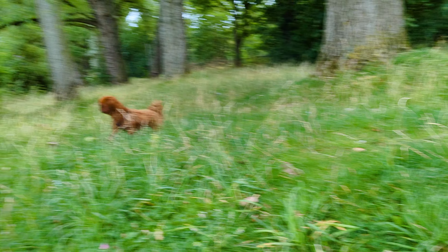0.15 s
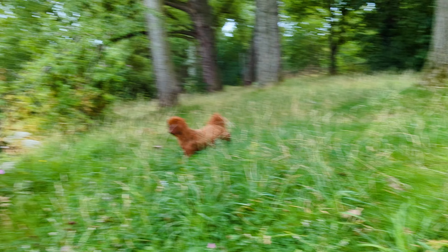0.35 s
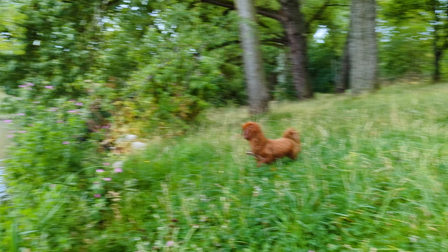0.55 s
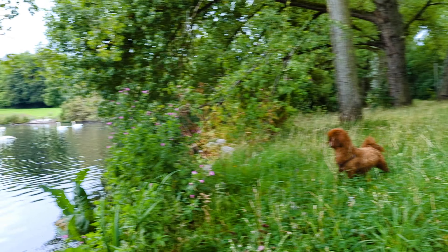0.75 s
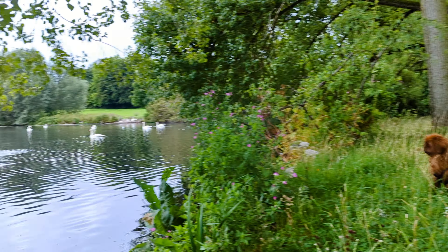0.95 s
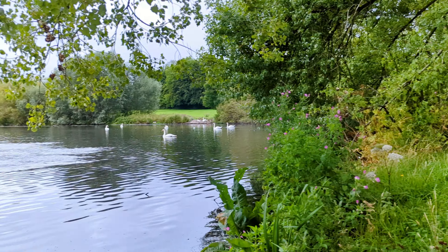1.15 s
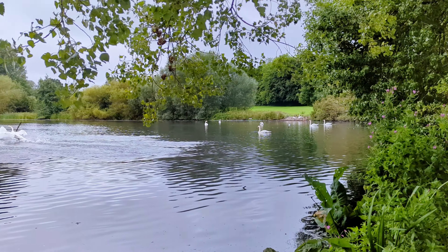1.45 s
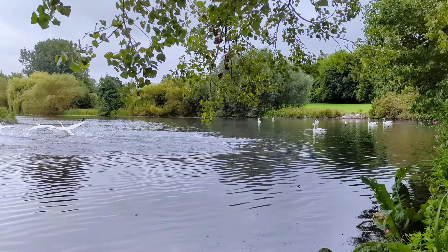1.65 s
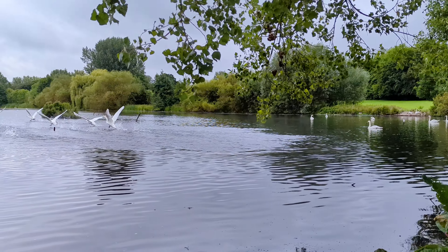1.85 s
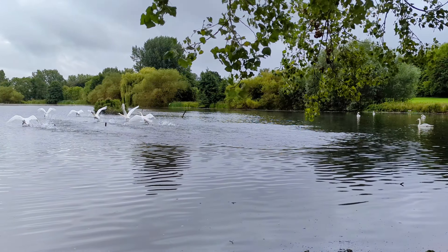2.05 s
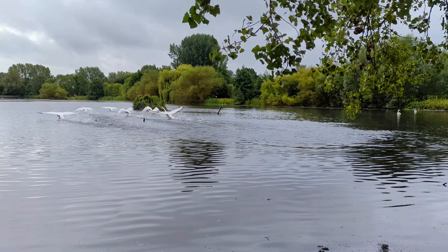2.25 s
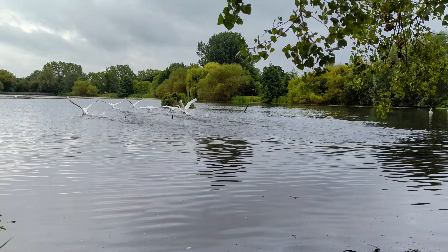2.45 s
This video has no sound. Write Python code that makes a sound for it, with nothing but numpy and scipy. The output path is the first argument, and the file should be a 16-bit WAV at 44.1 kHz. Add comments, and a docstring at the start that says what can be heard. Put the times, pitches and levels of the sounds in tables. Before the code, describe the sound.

Swans taking off slap lake water almost from the start, softly at first, then louder and denser from about 1 second, with a strong crack near 1.5, continuing to the end at 2.6. Hollow wing puffs are strongest around 1.3. Deep wind thumps hit mostly left from 0.35 to 0.9, then ease. The flock drifts right over churning, bubbling water, distant low roar and leaf hiss.

```python
"""A low rumble and the soft sound of a lake come first; almost at once swans taking off slap the water.
Each slap is a burst of clicks and noise with two ringing air pockets and a puff of spray; wingbeats are hollow
puffs of noise. The flock moves from near the middle to the right. Wind and handling are deep noise with
pressure thumps, and the wind buffets are mostly on the left. Behind lie churned water (noise and tiny ringing
bubbles), a distant roar of slowly changing noise bands, and a hiss of leaves (separate noise in each ear)."""
import sys
import numpy as np
from scipy import signal
from scipy.fft import rfft, irfft, next_fast_len
from scipy.io import wavfile
from scipy.ndimage import uniform_filter1d

SR = 44100
rng = np.random.default_rng(int(sys.argv[2]) if len(sys.argv) > 2 else 0)


def master_out(mix):
    """Clip the mix to full scale and print it as 16-bit PCM to the path in sys.argv[1]."""
    frames = np.transpose(np.atleast_2d(mix))
    ceiling = np.clip(frames, -1, 1)
    pcm = np.round(ceiling * 32767).astype(np.int16)
    wavfile.write(sys.argv[1], SR, pcm)


N = 114660  # length of the scene in samples

# Levels are set before the microphone response; colours give only the balance between pitches.
# Slaps on the water: (time [s], level before SLAP_GAIN_DB [dB], plop before PLOP_GAIN_DB [dB], plop pitch [Hz],
#   spray before SPRAY_GAIN_DB [dB], ring pitch [Hz], ring [dB]); plop, spray and ring are relative to the crack
SLAPS = [(0.0779, -28, -7, 700, -21, 3020, -9), (0.111, -22, -4.5, 910, -19, 2090, -10),
         (0.36, -28.5, 0, 794, -19, 3280, -7), (0.399, -22.5, -21, 876, -18.5, 2020, 1),
         (0.4523, -25, -5, 870, -18, 2110, -4), (0.5346, -24.5, -16, 1020, -16, 3470, -4),
         (0.5784, -36, 10, 800, -25, 1990, -9), (0.6418, -25, -4.5, 830, -35, 1900, -5),
         (0.674, -20.5, -7, 710, -18.5, 1970, -2.5), (0.7406, -32, 2.5, 537, -33, 2550, 3),
         (0.7651, -26.5, -5, 816, -22, 1300, 2.5), (0.8229, -21.5, -3.5, 615, -22, 1770, -0.5),
         (0.9242, -20, -3.5, 760, -10.5, 4570, -12), (1.0275, -26, -2.5, 650, -16.5, 2630, -7),
         (1.0872, -15.5, -12.5, 970, -17.5, 3380, -12), (1.1247, -21.5, -15, 880, -20, 1590, -8),
         (1.207, -19, -11.5, 850, -17.5, 4540, -1.5), (1.2132, -29, -14, 840, -13, 4200, -3),
         (1.306, -25.5, -15, 700, -17.5, 2200, -7), (1.3491, -19.5, -19, 870, -18, 2190, 0),
         (1.4101, -21.5, -9, 950, -18, 1750, -9), (1.442, -28, -8, 700, -20, 2700, -5),
         (1.4792, -9.5, -19.5, 680, -23.5, 3100, -11), (1.5547, -30.5, 4, 610, -22, 1660, -9),
         (1.5757, -18, -5.5, 795, -21, 2390, -2.5), (1.5996, -23.5, -5, 850, -33, 2600, -5),
         (1.6169, -24, -10.5, 710, -16, 2210, -0.5), (1.69, -22, -8.5, 715, -20, 3850, -3),
         (1.721, -27, -8, 625, -16, 1605, -5), (1.7374, -25.5, 1, 735, -11, 3030, -5),
         (1.743, -16.5, -16, 765, -21.5, 2070, -18), (1.7552, -19, -5, 785, -22, 2480, -5.5),
         (1.845, -23.5, -14, 574, -24, 1640, 0.5), (1.8845, -27, -6, 834, -19, 2030, -1),
         (1.966, -21, -3, 786, -30, 2640, -5), (2.0127, -22, -3.5, 796, -26, 3190, -11),
         (2.0312, -19, -15, 775, -32, 2480, -7), (2.0547, -25.5, -2, 650, -12, 4180, -6),
         (2.1198, -25, -1.5, 765, -17.5, 1650, 0), (2.22, -32, -0.5, 580, -20, 2390, -6),
         (2.2437, -17, -9.5, 910, -17.5, 2980, -16), (2.277, -23.5, -9, 660, -19, 4400, 2.5),
         (2.3038, -20.5, -4, 795, -25, 1620, 0), (2.3362, -30.5, 2.5, 625, -16, 1590, -7),
         (2.391, -26.5, -4.5, 780, -22, 1670, -1), (2.4323, -22, -5, 576, -27, 1580, -0.5),
         (2.484, -33, 3, 670, -21, 4980, -6), (2.5096, -22.5, -12, 850, -33, 2120, -3),
         (2.5272, -15.5, -13, 650, -24.5, 1600, -7), (2.549, -20.5, -11, 850, -26, 1830, -8),
         (2.581, -23.5, -2, 750, -22, 1745, -2)]
# Colour of the crack and of the spray: (frequency [Hz], level [dB per Hz])
CRACK_COLOUR = [(200, -19.5), (600, -5.5), (1100, -2), (1900, -0.5), (3000, -0.5), (4600, -3.5),
                (6500, -12.5), (10000, -31.5), (16000, -57)]
SPRAY_COLOUR = [(1500, -17), (4000, 10.5), (5500, 7), (7000, 8), (9300, 7), (11000, -0.5), (13000, -33),
                (16000, -50)]
# Patter of faint slaps: (time [s], level [dB])
PATTER_LEVEL = [(0, -60.5), (1.2, -56.5), (1.7, -52), (2.6, -52.5)]
# Direction of the flock: (time [s], left minus right [dB])
FLOCK_PAN = [(0, -1), (.7, -3.5), (1.2, -5), (1.8, -5.5), (2.6, -7)]
# Downstrokes of the wings: (time [s], peak level [dB])
WINGBEATS = [(.25, -47.5), (.59, -47), (.7, -46), (.83, -45), (.95, -42.5), (1.18, -42), (1.27, -39),
             (1.48, -41.5), (1.6, -54), (1.765, -41.5), (2.04, -42), (2.3, -46), (2.58, -44)]
# Colour of a downstroke: (frequency [Hz], level [dB per Hz])
WHOOSH_COLOUR = [(150, -25.5), (350, -5.5), (550, -0.5), (800, 5.5), (950, -2.5), (1300, -22),
                 (3000, -32.5)]
# Steady wind rumble at each port: (time [s], level [dB])
RUMBLE_LEFT_LEVEL = [(0, -48.5), (.33, -26), (.42, -31), (.6, -29), (.7, -22.5), (.92, -35.5), (.98, -40),
                     (1.04, -32.5), (1.3, -38.5), (1.4, -48), (1.66, -62), (1.73, -43), (1.9, -46.5),
                     (2.08, -44), (2.25, -60), (2.42, -61), (2.6, -63)]
RUMBLE_RIGHT_LEVEL = [(0, -38.5), (.35, -38), (.6, -39), (.85, -32), (.97, -37), (1.05, -28), (1.37, -48),
                      (1.65, -56), (1.85, -55), (2.28, -54), (2.4, -66), (2.6, -42)]
# Colours of the steady rumble and of the buffets: (frequency [Hz], level [dB per Hz])
RUMBLE_COLOUR = [(12, -10), (28, 1.5), (65, 3), (130, -1.5), (200, -12), (320, -27.5), (600, -42.5),
                 (1500, -63)]
BUFFET_COLOUR = [(15, -4.5), (35, 1), (65, 2.5), (130, -4), (220, -10.5), (350, -19.5), (600, -38),
                 (1500, -57), (4000, -71)]
# Single buffets of wind: (time [s], left level [dB], half length [s], right minus left [dB])
BUFFETS = [(.356, -25, .008, -14), (0.377, -15, 0.008, -20), (.384, -16, .005, -20), (.402, -24, .02, -8),
           (0.478, -17, 0.011, -14), (0.49, -18.5, 0.0056, -7), (0.51, -20, 0.0048, -12),
           (.591, -22, 0.0067, -18), (0.634, -17, 0.011, -18), (0.662, -19, 0.0075, -19),
           (.69, -20.5, 0.014, -14), (0.721, -15, 0.011, -24), (0.751, -20, .011, -17),
           (0.772, -26, 0.011, -8), (0.843, -19, 0.011, -0.5), (0.897, -20.5, 0.01, -14),
           (1.042, -28, .011, 1), (1.287, -28.5, 0.012, -6), (2.182, -31, .014, -1), (2.255, -28, 0.02, -6),
           (2.305, -37, .016, 9)]
# Deep flutter from handling: its colour (frequency [Hz], level [dB per Hz]), then (time [s], level [dB])
SWAY_COLOUR = [(10, -1), (25, 2), (55, -1), (90, -15), (200, -34.5), (800, -87)]
SWAY_LEVEL = [(0, -40), (.85, -26), (.98, -39), (1.1, -29), (1.4, -43), (1.64, -41), (1.72, -37.5),
              (1.9, -44.5), (2.08, -37), (2.27, -36), (2.35, -46), (2.6, -42)]
# Churned water: its colour (frequency [Hz], level [dB per Hz]), then (time [s], level [dB])
WASH_COLOUR = [(500, 0), (1100, -1), (1700, 3.5), (2600, 1.5), (4400, -4.5), (6500, -8), (9000, -6.5),
               (12000, -30), (16000, -38)]
WASH_LEVEL = [(0, -46.5), (.4, -45.5), (.8, -44.5), (1.2, -45.5), (1.7, -45), (2.1, -45), (2.6, -47)]
# Distant roar: its colour (frequency [Hz], level [dB per Hz]), then (time [s], level [dB])
ROAR_COLOUR = [(60, -8), (150, 7), (260, -4.5), (350, -0.5), (460, -5.5), (640, -1.5), (830, 0.5),
               (1150, -13), (1600, -14.5), (3000, -45.5)]
ROAR_LEVEL = [(0, -48), (.14, -43.5), (.6, -40.5), (1.15, -43.5), (1.4, -44.5), (2.1, -42.5), (2.2, -46.5),
              (2.6, -46)]
# Borders between the bands of the roar that drift separately: (frequency [Hz])
ROAR_BORDERS = [330, 540, 700, 880]
# Hiss of leaves: its colour (frequency [Hz], level [dB per Hz]), then (time [s], level [dB])
LEAVES_COLOUR = [(1500, -32.5), (3500, 1), (5000, 0), (6500, -4), (8200, -4.5), (9500, -3.5), (11000, -8),
                 (13000, -13.5), (16000, -35)]
LEAVES_LEVEL = [(0, -53), (.12, -46), (.3, -49.5), (.55, -47.5), (.85, -45.5), (1, -48), (1.4, -48),
                (1.75, -48.5), (2.2, -49.5), (2.6, -50.5)]
# Response of the two microphone ports: (frequency [Hz], gain [dB])
LEFT_PORT = [(3000, 2), (5000, -0.5), (7000, 2.5), (9500, 4.5), (12000, -3)]
RIGHT_PORT = [(3000, 0), (5000, -2), (7000, -4.5), (9500, -10.5), (12000, -5)]

SLAP_GAIN_DB, PLOP_GAIN_DB, SPRAY_GAIN_DB = 8, 7.5, 17.5  # added to the columns of SLAPS
CRACK_LAG_S = 0.0016  # the crack comes this long after its listed time
SMACK_SPAN_S, SMACK_DB = 0.0028, -2  # the smacks after the crack: their span, level of the first one drawn
CRACK_DECAY_S, CRACK_TAIL_DB = 0.0054, -6.5
SPRAY_DECAY_S, SPRAY_TAIL_DB = 0.009, 1
RING_CYCLES, PLOP_CYCLES, BUBBLE_CYCLES = 4, 2.2, 5  # cycles until the ringing falls to about a third
PATTER_PER_S, PATTER_SCATTER_DB = 110, 3
ECHO_DB, ECHO_DECAY_S = -9, 0.1
STROKE_S = 0.033  # from the peak of a downstroke until its power falls to about a third
RAGGED_DB, EDDY_S = 2, 0.0374  # typical depth of the bursts; span over which strength is evened out
THUMP_DB, THUMP_SHARE = 1.5, 0.35  # thump relative to its buffet; its width as a share of the half length
OVERLOAD_DB = -3  # the wind flattens as it nears this pressure
WASH_WIDTH, ROAR_WIDTH = 0.41, 0.022  # share of the noise that differs between the ears
BUBBLES_PER_S, BUBBLE_LOW_HZ, BUBBLE_HIGH_HZ = 300, 841, 3630
BUBBLE_DB, BUBBLE_RANGE_DB = -6, 33.5  # level relative to the wash; spread from strong to weak
ROAR_DRIFT_DB, ROAR_DRIFT_PER_S = 1.3, 14
TOP_HZ = 15900  # upper limit of the treble


def swans():
    """Near slaps, a patter of fainter ones, and a soft, dying return from the trees."""
    near = np.zeros((2, N + SR))
    for time_s, level_db, *timbre in SLAPS:
        blow = undb(SLAP_GAIN_DB + level_db) * slap(*timbre)
        start = int((time_s + CRACK_LAG_S) * SR)
        near[:, start:start + blow.shape[1]] += blow
    happens = rng.random(N) < PATTER_PER_S / SR
    scatter = np.clip(rng.standard_normal(N), -2, 1.5)
    clicks = happens * undb(PATTER_SCATTER_DB * scatter)
    patter = undb(curve(PATTER_LEVEL)) * unit(colour(clicks, CRACK_COLOUR))
    direct = (near[:, :N] + patter) * pan(curve(FLOCK_PAN))
    t = np.arange(SR // 2) / SR
    echo = []
    for channel in direct:
        reflections = norm(rng.standard_normal(len(t)) * np.exp(-t / ECHO_DECAY_S))
        echo.append(signal.fftconvolve(channel, reflections)[:N])
    return direct + undb(ECHO_DB) * np.array(echo)


def slap(plop_db, plop_hz, spray_db, ring_hz, ring_db, size=2048, count=3):
    """A blow on water: a crack, quick smacks, a large and a small ringing air pocket, a puff of spray."""
    t = np.arange(size) / SR
    hits = np.zeros(size)
    hits[0] = 1
    smack_at = (rng.uniform(.1, 1, count) * SMACK_SPAN_S * SR).astype(int)
    hits[smack_at] += undb(SMACK_DB) / np.arange(1, count + 1)
    hits = norm(hits)
    crack_tail = undb(CRACK_TAIL_DB) * drops(CRACK_DECAY_S, t)
    crack = norm(colour(hits + crack_tail, CRACK_COLOUR))
    plop = pocket(plop_hz, PLOP_CYCLES, t)
    ring = pocket(ring_hz, RING_CYCLES, t)
    spray = []
    for _ in range(2):  # separate drops for each ear
        spray_tail = undb(SPRAY_TAIL_DB) * drops(SPRAY_DECAY_S, t)
        spray.append(norm(colour(hits + spray_tail, SPRAY_COLOUR)))
    body = crack + undb(PLOP_GAIN_DB + plop_db) * plop + undb(ring_db) * ring
    return body + undb(SPRAY_GAIN_DB + spray_db) * np.array(spray)


def drops(decay_s, t):
    """Spray drops: cubing the noise makes a few strong clicks stand out while it dies away."""
    return norm(rng.standard_normal(len(t)) ** 3 * np.exp(-t / decay_s))


def pocket(hz, cycles, t):
    """A trapped pocket of air rings at one pitch and dies away."""
    return norm(np.sin(2 * np.pi * hz * t) * np.exp(-t * hz / cycles))


def wings():
    """Each downstroke is a short, hollow rush of air, made of noise that swells and fades."""
    t = np.arange(N) / SR
    power = sum(undb(db) ** 2 * np.exp(-((t - time_s) / STROKE_S) ** 2) for time_s, db in WINGBEATS)
    return eddies(WHOOSH_COLOUR) * np.sqrt(power) * pan(curve(FLOCK_PAN) * 0.75)


def wind():
    """Ports rumble separately; buffets add a pressure thump and eddies; handling adds a deep flutter."""
    t = np.arange(N) / SR
    levels = (RUMBLE_LEFT_LEVEL, RUMBLE_RIGHT_LEVEL)
    pressure = np.array([eddies(RUMBLE_COLOUR) * undb(curve(level)) for level in levels])
    swirl = np.array([eddies(BUFFET_COLOUR), eddies(BUFFET_COLOUR)])
    for time_s, left_db, half_s, right_db in BUFFETS:
        u = (t - time_s) / (half_s * THUMP_SHARE)
        thump = undb(THUMP_DB) * (1 - 2 * u ** 2) * np.exp(-u ** 2)  # a push with a dip on both sides
        burst = swirl * np.exp(-.5 * ((t - time_s) / half_s) ** 2)
        pressure += undb([[left_db], [left_db + right_db]]) * (thump + burst)
    flutter = np.array([eddies(SWAY_COLOUR), eddies(SWAY_COLOUR)]) * undb(curve(SWAY_LEVEL))
    pressure += flutter
    limit = undb(OVERLOAD_DB)
    return limit * np.tanh(pressure / limit)  # strong peaks flatten


def eddies(points):
    """Turbulent air: noise with ragged bursts before colouring, then evened out in strength."""
    ragged = rng.standard_normal(N) * undb(RAGGED_DB * walk(70))
    x = colour(ragged, points)
    return x / np.sqrt(uniform_filter1d(x ** 2, int(EDDY_S * SR)) + 1e-20)


def water():
    """Churned water is fluttering noise mixed with ringing bubbles."""
    flutter = undb(1.9 * walk(59.88) - 2.0)
    wash = spread(WASH_COLOUR, WASH_WIDTH) * flutter
    return (wash + bubbles()) * undb(curve(WASH_LEVEL)) * pan(curve(FLOCK_PAN) * 0.55)


def bubbles(size=1024):
    """Falling drops leave many small, briefly ringing bubbles in the wake."""
    out = np.zeros((2, N + size))
    t = np.arange(size) / SR
    for when, pitch, weakness, side in rng.random((int(BUBBLES_PER_S * N / SR), 4)):
        hz = BUBBLE_LOW_HZ * (BUBBLE_HIGH_HZ / BUBBLE_LOW_HZ) ** pitch
        start = int(when * N)
        ring = undb(-BUBBLE_RANGE_DB * weakness) * pocket(hz, BUBBLE_CYCLES, t)
        out[:, start:start + size] += ring * pan(10 * (side - 2.0))  # right is 10 to 20 dB louder
    return unit(out[:, :N]) * undb(BUBBLE_DB)


def roar():
    """A distant roar is low noise, almost the same in both ears, that wanders in level and colour."""
    sound = drift(spread(ROAR_COLOUR, ROAR_WIDTH))
    return sound * undb(curve(ROAR_LEVEL) + 2.77 * walk(20)) * pan(curve(FLOCK_PAN) * 0.55)


def drift(x):
    """Each band swells and sinks on its own, so the colour wanders."""
    spectrum = rfft(x)
    band = np.searchsorted(ROAR_BORDERS, np.arange(N // 2 + 1) * SR / N)
    total = np.zeros_like(x)
    for k in np.unique(band):
        swell = undb(ROAR_DRIFT_DB * walk(ROAR_DRIFT_PER_S))
        total += irfft(spectrum * (band == k), N) * swell
    return unit(total)


def leaves():
    """Leaves hiss all around: separate noise in each ear, flickering together in level."""
    hiss = np.array([noise(LEAVES_COLOUR), noise(LEAVES_COLOUR)])
    return hiss * undb(curve(LEAVES_LEVEL) + 2.0 * walk(70))


def undb(db):
    """Turn decibels into a gain."""
    return 10 ** (np.asarray(db) / 20)


def curve(rows):
    """Join rows of (time [s], value) by straight lines."""
    return np.interp(np.arange(N) / SR, *np.array(rows).T)


def unit(x):
    """Scale to an rms (average strength) of 1."""
    return x / np.sqrt(np.mean(x ** 2) + 1e-20)


def norm(x):
    """Scale to a total energy of 1."""
    return x / np.sqrt(np.sum(x ** 2) + 1e-20)


def colour(x, points):
    """Filter through (frequency [Hz], gain [dB]) points without any sound ahead of its cause."""
    size = next_fast_len(2 * len(x))
    size += size % 2
    hz, db = np.array(points).T
    f = np.maximum(np.arange(size // 2 + 1) * SR / size, 1)
    gain = undb(np.interp(np.log(f), np.log(hz), db))
    # Folding the cepstrum (spectrum of the log gain) onto positive times makes the filter minimum phase.
    cepstrum = irfft(np.log(gain))
    cepstrum[1:size // 2] *= 2
    cepstrum[size // 2 + 1:] = 0
    return irfft(rfft(x, size) * np.exp(rfft(cepstrum)))[:len(x)]


def noise(points):
    """Coloured noise of rms 1."""
    return unit(colour(rng.standard_normal(N), points))


def spread(points, width):
    """Noise common to both ears plus a share of opposite sign in each."""
    return noise(points) + width * noise(points) * np.array([[1], [-1]])


def walk(rate):
    """A random wandering of rms 1: rate new values a second, smoothed twice."""
    k = int(SR / rate)
    steps = np.repeat(rng.standard_normal(N // k + 1), k)
    return unit(uniform_filter1d(uniform_filter1d(steps, k), k)[:N])


def pan(db):
    """Left and right gains for a left minus right difference in dB."""
    gains = undb(np.array([db, -db]).reshape(2, -1) / 2)
    return gains / gains.mean(axis=0)


def scene():
    """Swans and wings in front, wind on the microphone, water, roar and leaves behind."""
    return swans() + wings() + wind() + water() + roar() + leaves()


def record(dry):
    """The left port is brighter than the right; a steep filter cuts the top of the treble."""
    heard = np.array([colour(dry[0], LEFT_PORT), colour(dry[1], RIGHT_PORT)])
    treble_cut = signal.ellip(8, .2, 70, TOP_HZ, fs=SR, output="sos")
    return signal.sosfilt(treble_cut, heard)


dry = scene()
out = record(dry)
master_out(out)
```